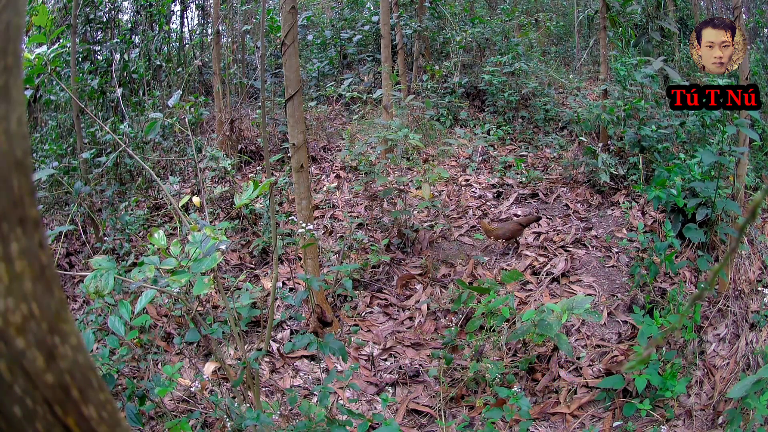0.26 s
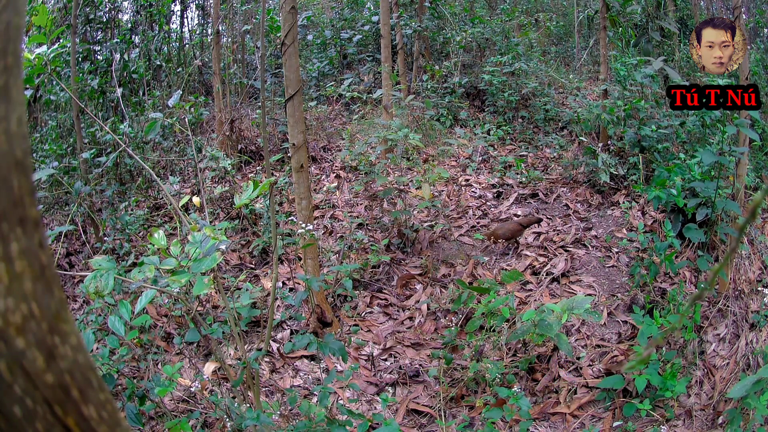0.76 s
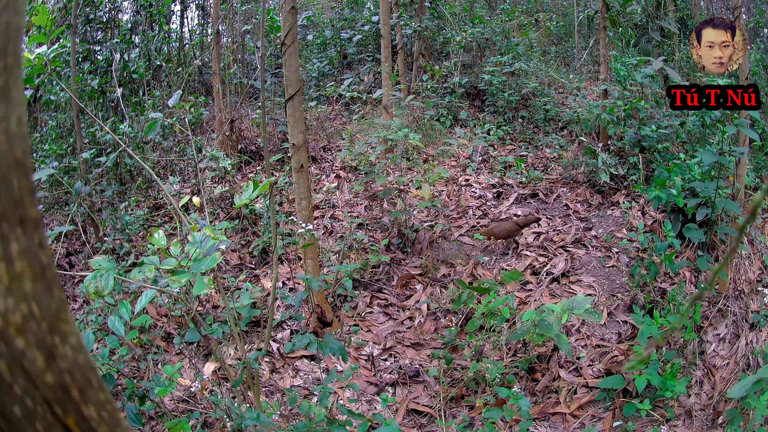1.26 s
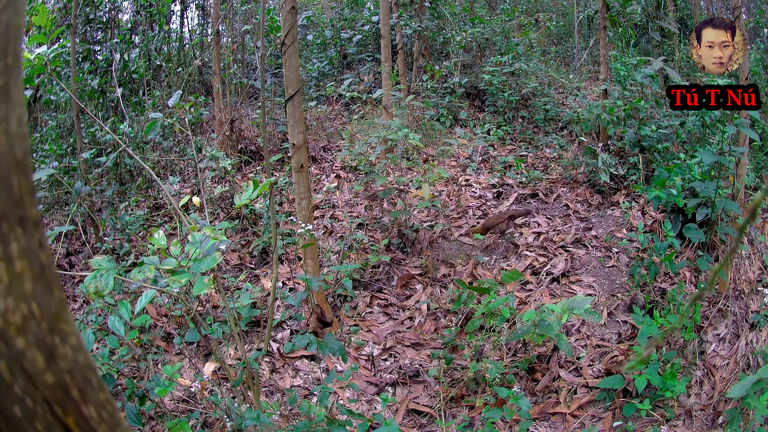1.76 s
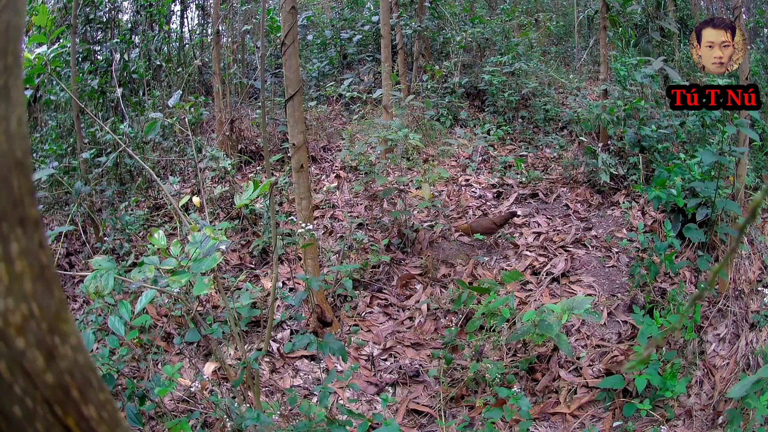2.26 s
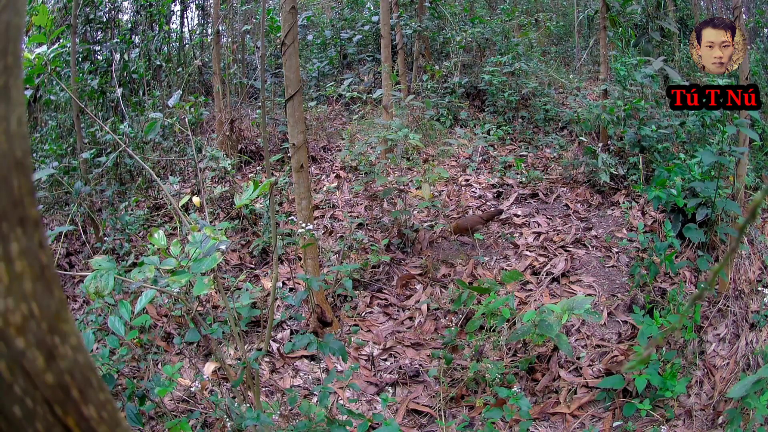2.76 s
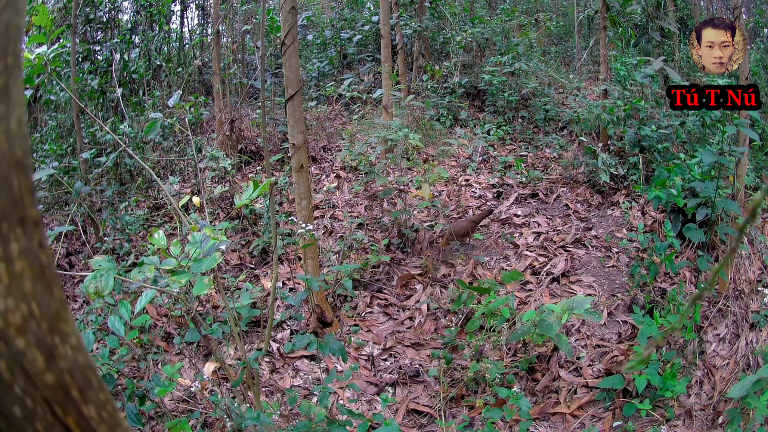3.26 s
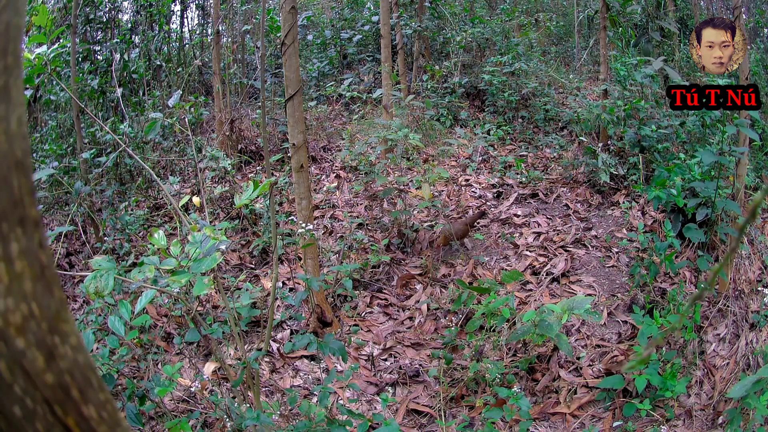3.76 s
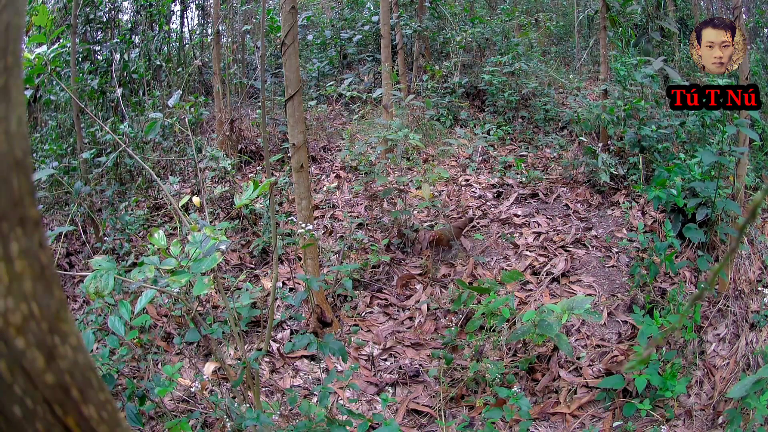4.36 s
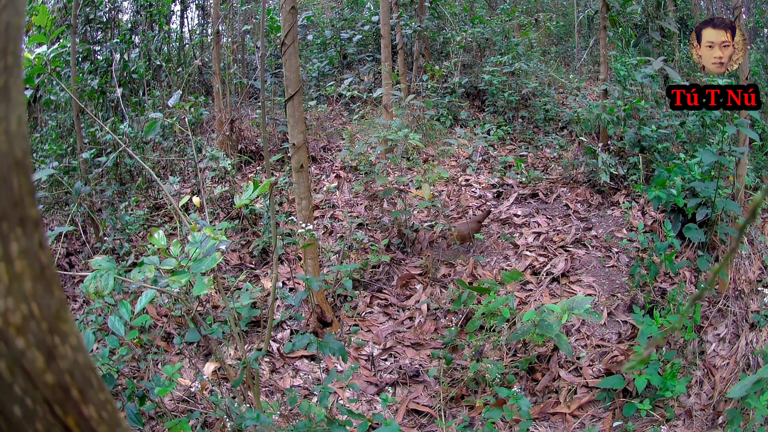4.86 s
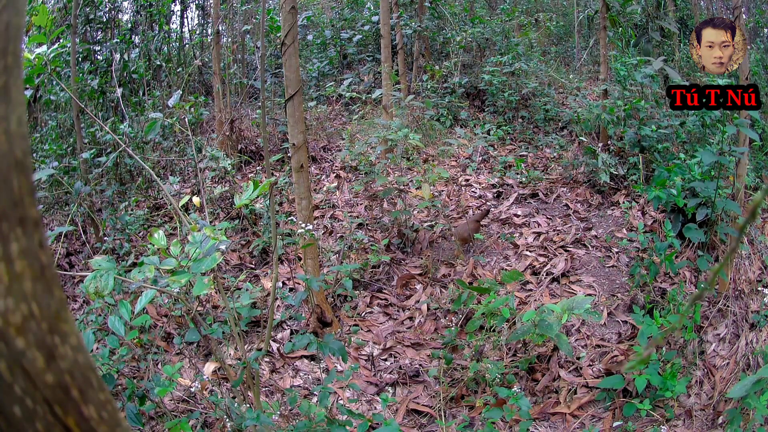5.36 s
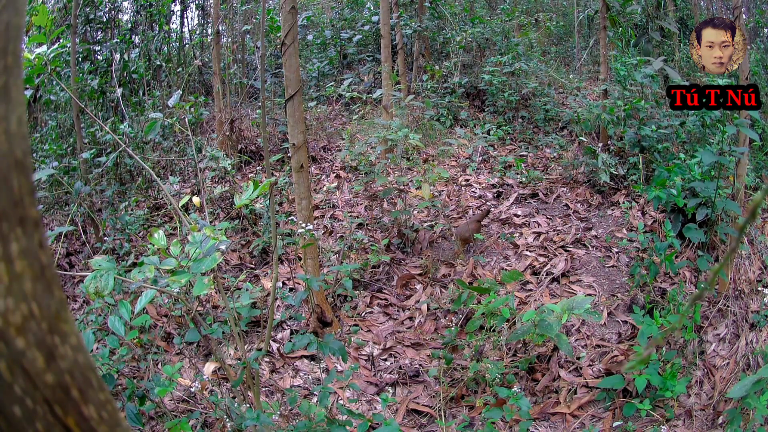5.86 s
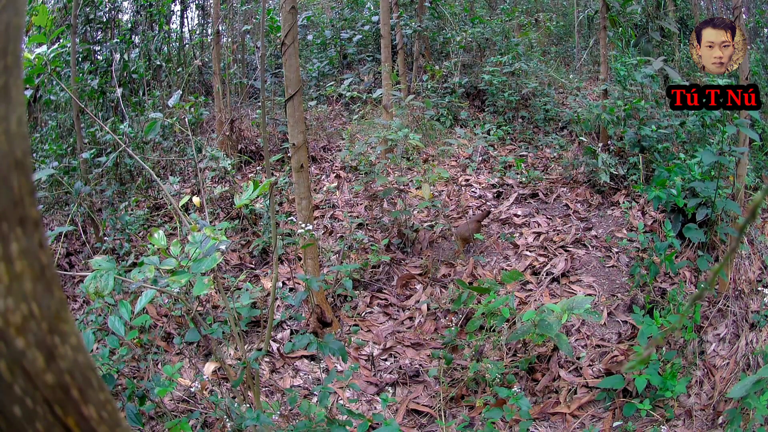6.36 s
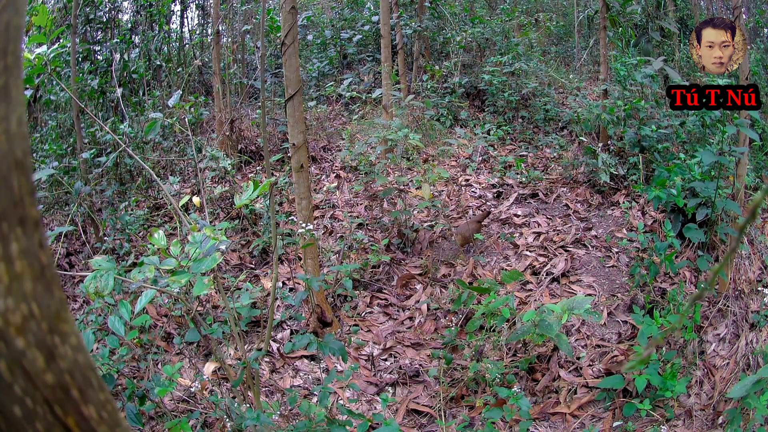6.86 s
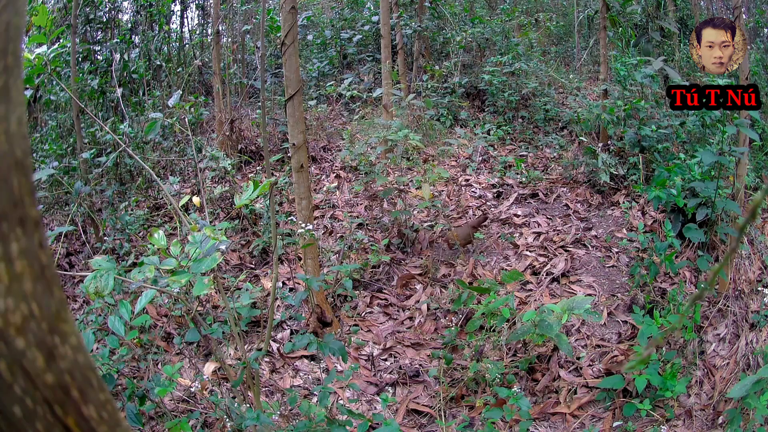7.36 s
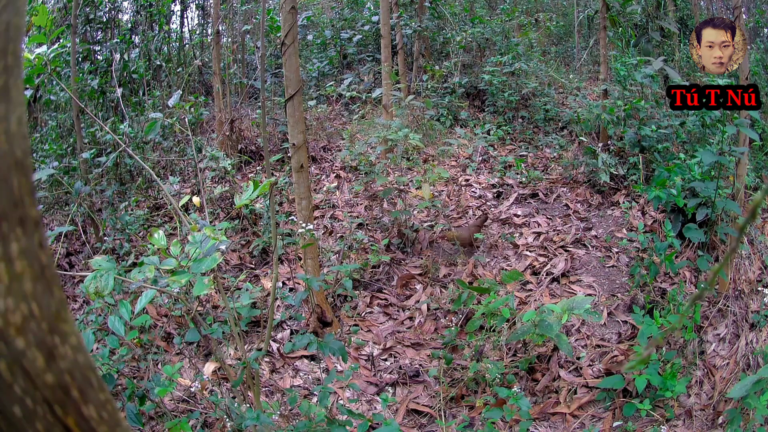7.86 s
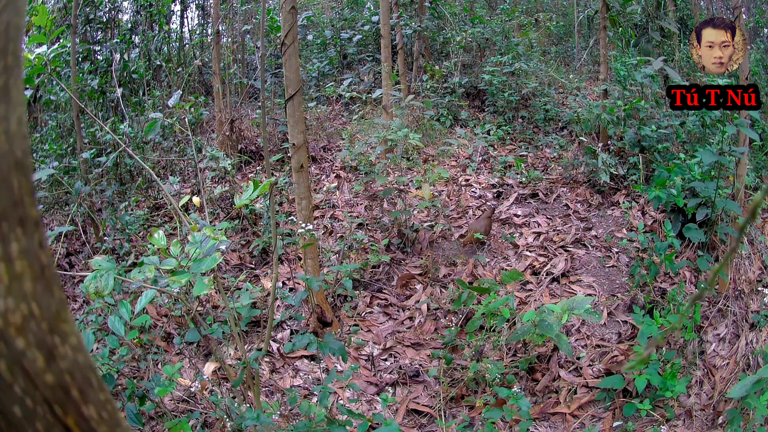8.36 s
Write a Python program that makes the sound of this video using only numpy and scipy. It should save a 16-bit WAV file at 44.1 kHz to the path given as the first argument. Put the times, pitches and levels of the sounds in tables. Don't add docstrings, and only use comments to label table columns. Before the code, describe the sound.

Rapid hoarse bird clucks follow a loud two-push wail in a quiet forest, tiring into ragged squawks before faint leaf rustle and ticks.

```python
import sys
import numpy as np
from scipy import signal
from scipy.fft import rfft, irfft, next_fast_len
from scipy.io import wavfile
from scipy.ndimage import uniform_filter1d, map_coordinates

SR = 44100
rng = np.random.default_rng(int(sys.argv[2]) if len(sys.argv) > 2 else 0)


def ratio_of_db(decibels):
    return 10 ** (np.asarray(decibels, float) / 20)


def put_to_file(sound):
    columns = np.atleast_2d(sound).T
    safe = np.clip(columns, -1, 1)
    whole_steps = np.round(safe * 32767)
    wavfile.write(sys.argv[1], SR, whole_steps.astype(np.int16))


N = 380141
TIME = np.arange(N) / SR


def along(points, hz):
    point_hz, value = np.transpose(points)
    return np.interp(np.log(hz + 1), np.log(point_hz + 1), value)


def curve(points):
    return np.interp(TIME, *np.transpose(points))


def unit(x):
    return x / np.sqrt(np.mean(x ** 2) + 1e-20)


def filtered(x, response):
    size = next_fast_len(N + SR // 2)
    spectrum = rfft(x, size) * response(np.fft.rfftfreq(size, 1 / SR))
    return irfft(spectrum, size)[..., :N]


def resonances(table):
    def ring(f, hz, width):
        return 1j * f * width / (hz * hz - f * f + 1j * f * width)

    def response(f):
        return sum((-1) ** k * ratio_of_db(db) * ring(f, hz, width) ** 2 for k, (hz, width, db) in enumerate(table))
    return response


def wobble(rate):
    return map_coordinates(rng.standard_normal(int(N * rate / SR) + 4), [TIME * rate])


def turns(hz):
    return 2 * np.pi * np.cumsum(hz) / SR


def played(calls, edge_s):
    calls = sorted(calls, key=lambda call: call[0][0])
    s, *columns = np.transpose(np.concatenate(calls))
    s = np.minimum.accumulate(s[::-1])[::-1]
    gate = np.zeros(N)
    for call in calls:
        gate[round(call[0][0] * SR):round(call[-1][0] * SR) + 40] = 1
    gate = uniform_filter1d(gate, int(edge_s * SR) + 1)
    return gate, [np.interp(TIME, s, column) for column in columns]


# start_s, hoarseness (0 to 1)
VOICE_WEAR = [(1, .15), (2.9, .4), (3.1, .8), (4.3, .8), (4.5, 1), (7, 1)]


def hoarseness():
    return curve(VOICE_WEAR)


# start_s, swell_s, fall_s, onset_db, top_db
STEADY_CLUCKS = [(1.165, .018, 0.013, -49, -39.5), (1.275, .025, 0.056, -42, -36),
                 (1.435, 0.052, 0.016, -43.5, -34.5), (1.639, .072, .036, -34.5, -35.5),
                 (1.838, 0.073, 0.035, -36.5, -34), (2.032, 0.069, 0.022, -34, -35.5),
                 (2.225, 0.076, 0.031, -38.5, -35), (2.425, 0.071, 0.026, -36, -35),
                 (2.624, .064, 0.037, -39, -35.5), (2.831, 0.069, 0.036, -37.5, -36.5),
                 (2.932, .015, .015, -52, -61), (3.041, 0.069, 0.038, -46, -38),
                 (3.252, .022, .01, -45.5, -40), (3.288, 0.039, 0.048, -41.5, -35.5),
                 (3.487, .078, 0.036, -41, -36.5), (3.711, 0.072, .028, -39.5, -34.5),
                 (3.937, 0.058, .048, -38.5, -34.5), (4.155, 0.075, .015, -38.5, -36),
                 (4.245, .022, .02, -47, -49.5)]
# start_s, swell_s, fall_s, onset_db,
# top_db
TIRED_CALLS = [(4.405, .035, 0.0081, -44, -47), (4.449, 0.036, 0.049, -37.5, -34.5),
               (4.53, 0.073, 0.022, -49.5, -47), (4.757, .012, .012, -46, -41),
               (4.782, .025, 0.0057, -62, -44), (4.816, 0.058, .05, -35, -37.5),
               (4.948, .036, .022, -37.5, -38), (5.15, 0.013, 0.02, -42, -43),
               (5.181, .03, .003, -68, -55), (5.218, .018, .036, -34.5, -35),
               (5.27, .046, .003, -54, -60), (5.32, .03, .06, -38, -38.5),
               (5.587, 0.0081, .014, -45, -42.5), (5.61, .045, .001, -49.5, -37),
               (5.657, .075, .022, -38, -37.5), (5.755, .012, .008, -38.5, -40),
               (5.776, 0.057, .022, -38.5, -37), (6.131, 0.0059, .012, -47, -44),
               (6.15, 0.072, .006, -56, -50), (6.239, 0.084, .011, -38.5, -39),
               (6.335, 0.053, 0.028, -39.5, -43.5), (6.415, 0.088, 0.039, -52, -39.5),
               (6.542, 0.12, 0.031, -55, -52),
               (6.839, .014, .008, -41.5, -37),
    (6.862, 0.019, .025, -41, -44),
]
# start_s, pitch_hz
POSTURE_PITCH = [(1.2, 2083), (2.5, 1950), (3.25, 2058), (3.9, 1912), (4.6, 1950), (5.3, 2098), (5.7, 2008),
                 (6.84, 2059), (6.86, 1820)]


def cluck_calls():
    calls = []
    for s, swell, fall, onset_db, top_db in STEADY_CLUCKS + TIRED_CALLS:
        start_hz = np.interp(s, *np.transpose(POSTURE_PITCH))
        low_hz = start_hz - min(1000 * swell, 90)
        loss_db = min(803 * fall, 24.5)
        top_s = s + swell
        calls.append([
            (s, onset_db, start_hz),
            (top_s, top_db, low_hz),
            (top_s + 0.5 * fall, top_db - 0.28 * loss_db, low_hz),
            (top_s + fall, top_db - loss_db, low_hz + 40.02),
        ])
    return calls


BEAK_OPENING_HZ = [1790, 1930, 2078]
# pitch_hz, width_hz, level_db
WINDPIPE_RING = [(696, 410, -8), (960, 730, -9.5), (1281, 110, -3), (1533, 350, 4)]
# pitch_hz, width_hz, level_db
HEAD_RING = [(2410, 57, 1), (2490, 63, -32), (4136, 77, -18.5), (4800, 240, -28.5), (5107, 48, -21),
             (7440, 2050, -32.5)]


def clucks():
    gate, (db, throat_hz) = played(cluck_calls(), edge_s=.004)
    hoarse = hoarseness()
    cycles = np.where((hoarse > .6) & (wobble(90) > .1), 3, 2)
    wander = (.055 + .03 * hoarse) * wobble(330) + .03 * wobble(40)
    slap_rate = throat_hz / cycles * (1 + wander)
    at = np.flatnonzero(np.diff(np.floor(np.cumsum(slap_rate) / SR)))
    slaps = np.zeros(N)
    slaps[at] = np.sqrt(cycles[at]) * (1 + .75 * rng.uniform(-1, 1, N)[at])
    slaps = gate * (slaps - slaps.mean()) * ratio_of_db(0.34 * wobble(120))

    def level_match(response):
        return 1 / np.sqrt(np.mean(filtered(slaps, response) ** 2) / np.mean(gate ** 2))
    throat_gain = level_match(resonances([(1950, 505, 0.021)]))
    windpipe = resonances(WINDPIPE_RING)
    windpipe_db = db - 0.12 * (db + 27) - 11.5
    head_db = db + 0.19 * (db + 23.5)
    voice = filtered(slaps * ratio_of_db(windpipe_db), windpipe) * level_match(windpipe)
    voice += filtered(slaps * ratio_of_db(head_db), resonances(HEAD_RING)) * throat_gain
    for k, hz in enumerate(BEAK_OPENING_HZ):
        share = np.interp(throat_hz, sorted(BEAK_OPENING_HZ), np.arange(len(BEAK_OPENING_HZ)) == k)
        voice += filtered(slaps * share * ratio_of_db(db + 1.02), resonances([(hz, 600, 0)])) * throat_gain
    return voice


def pushed(points, doubling_db):
    return [(s, hz / 2, -55.5 + 0.29 * (db + 48.5), db + doubling_db, db) for s, hz, db in points]


# start_s, octave pitch_hz, level_db
OPENING_WHISTLE = [(0.735, 1528, -66), (0.745, 1521, -50), (0.763, 1546, -48.5), (0.791, 2014, -73.5),
                   (0.817, 1670, -49), (0.845, 1940, -58.5), (0.983, 2137, -52.5), (1.0, 1947, -46)]
# start_s, octave pitch_hz, level_db
LOUD_WAIL = [
    [(1.0, 1930, -54), (1.028, 1944, -45.5), (1.176, 2085, -33.5), (1.232, 2038, -40.5),
     (1.254, 2090, -36.5), (1.27, 2182, -39), (1.285, 2202, -41)],
    [(1.286, 2094, -35.5), (1.31, 2018, -34.5), (1.32, 2172, -44), (1.394, 2011, -43), (1.44, 2232, -40.5),
     (1.498, 2025, -38), (1.51, 2110, -46)],
]


def whistle_and_wail():
    return [pushed(OPENING_WHISTLE, -23)] + [pushed(push, -15) for push in LOUD_WAIL]


def sung(row, turn_share, bends, swells_db, octave_db=-5.5):
    s, length, hz, db, doubling_db = row
    points = []
    for share, bend, rel_db in zip((0, turn_share, 1), bends, swells_db):
        level_db = db + rel_db
        points.append((s + share * length, hz * (1 + bend), level_db, level_db + doubling_db, level_db + octave_db))
    return points


# start_s, length_s, pitch_hz, level_db, doubling_db (half-way partial)
LINKING_NOTES = [(1.567, 0.032, 944, -58, -15), (1.624, .015, 1312, -46.5, -5),
                 (1.798, 0.037, 980, -53, -10), (2.002, 0.039, 960, -51, -17), (2.172, .055, 1006, -52, -9),
                 (2.357, 0.0398, 982, -53, -8), (2.538, .035, 977, -51.5, -12),
                 (2.574, .025, 1016, -51.5, -5), (2.733, .06, 1000, -51.5, -8),
                 (4.412, .05, 1271, -50, 1.5), (4.54, .05, 1130, -59, -4)]


def linking_notes():
    return [sung(row, .4, (-.09, 0, .01), (-1.5, 0, -2.5)) for row in LINKING_NOTES]


# start_s, length_s, pitch_hz, level_db, doubling_db
HELD_NOTES = [(2.91, .045, 993, -55.5, -1.5), (3.125, 0.057, 960, -50, -13), (3.362, .078, 902, -48, -9),
              (3.57, 0.069, 934.4, -49, -12.5), (3.75, .065, 969, -50.5, -10),
              (4.69, .075, 1022, -51, -8.5), (4.9, .07, 1001, -48.5, -6.5),
              (5.59, 0.061, 1071, -52.5, -6.5), (6.42, 0.14, 1190, -56.5, -11),
              (6.58, 0.078, 1192, -56, -9.5)]


def held_notes():
    return [sung(row, .3, (-.03, 0, .015), (-1.5, 0, -1.5)) for row in HELD_NOTES]


# start_s, length_s, pitch_hz, level_db, doubling_db
CLIMBING_NOTES = [(1.982, 0.0158, 811, -56, -23), (3.27, 0.028, 1240, -54, -10),
                  (4.77, 0.051, 1161, -54.5, -4), (5.165, 0.051, 1164, -52.5, -6.5),
                  (5.27, .06, 1167, -56, -8), (6.13, .12, 1170, -56, -6)]


def climbing_notes():
    return [sung(row, .6, (-.03, 0, .1), (-1.5, 0, 6), octave_db=-2.5) for row in CLIMBING_NOTES]


# start_s, length_s, from pitch_hz, to pitch_hz, level_db
PIP_NOTES = [
    (1.609, 0.01884, 1834, 1360, -52),
    (2.4, 0.02063, 1480, 1520, -53),
    (6.549, 0.033, 1985, 1890, -40.5),
    (6.663, 0.029, 1925, 2023, -41),
]


def pips():
    calls = []
    for s, length, from_hz, to_hz, db in PIP_NOTES:
        calls.append([(s + u * length, from_hz + u * (to_hz - from_hz), db - 2.5 * abs(2 * u - 1) ** 2)
                      for u in (0, .25, .5, .75, 1)])
    gate, (hz, db) = played(calls, edge_s=0.0041)
    return gate * ratio_of_db(db) * np.sin(turns(hz))


# start_s, rate in beats per s
MEMBRANE_BEAT = [(1.01, 97), (1.116, 88.6), (1.17, 87)]


def beating():
    s, rate = np.transpose(MEMBRANE_BEAT)
    lasting = (TIME > s[0]) * (TIME < s[-1])
    return 1 + 0.48 * lasting * np.sin(turns(np.interp(TIME, s, rate)))


# multiple of the pitch, level_db below the octave
WHOLE_PARTIALS = [(3, -23.5), (4, -32.5), (5, -32)]
# multiple of the pitch, level_db below the doubling partial
HALF_PARTIALS = [(2.5, -11.5), (4.5, -22)]


def clear_notes():
    calls = whistle_and_wail() + linking_notes() + held_notes() + climbing_notes()
    gate, (hz, db, half_db, octave_db) = played(calls, edge_s=0.0028)
    turn = turns(hz * (1 + 0.0055 * wobble(150) + 0.0081 * wobble(40)))
    hoarse = hoarseness()
    breaks_db = 2.3 * (TIME > 1.52) * wobble(45)
    half_db = half_db + 2.5 * (TIME > 1.2) * wobble(35)
    shake_db = 2.96 * (TIME > 1.2) * (TIME < 1.52) * wobble(70.1)

    def partial(level_db, multiple):
        flutter = ratio_of_db((1 + .8 * (TIME > 1.27)) * wobble(110) + breaks_db) + .5 * hoarse * wobble(500)
        return ratio_of_db(level_db) * np.sin(multiple * turn) * flutter
    tone = beating() * partial(db + shake_db, 1) + partial(octave_db, 2)
    tone += partial(half_db, 1.5)
    tone += hoarse * partial(half_db - 7.5, .5)
    for multiple, rel_db in WHOLE_PARTIALS:
        tone += partial(octave_db + rel_db, multiple)
    for multiple, rel_db in HALF_PARTIALS:
        tone += partial(half_db + rel_db, multiple)
    return np.sqrt(2) * (gate * tone + pips())


# pitch_hz, level_db
BEAK_COLOUR = [(300, -23), (420, 5), (2750, 1), (3100, -13), (3400, -8), (3850, -10), (4050, 5),
               (5250, 7.5), (5500, -3), (9000, -8)]


def hen():
    return filtered(clear_notes() + clucks(), lambda hz: ratio_of_db(along(BEAK_COLOUR, hz)))


# start_s, chirp number, level_db
CRICKET_SONG = [(.756, 0, -90), (.862, 2, -67), (1.024, 5, -66), (1.591, 16, -63.5), (2.87, 41, -79),
                (3.885, 61, -62), (4.037, 64, -65), (4.29, 69, -84), (4.69, 77, -74), (5.386, 91, -60.5),
                (5.587, 95, -66), (5.79, 99, -97), (6.58, 114, -62.5), (6.788, 118, -64.5),
                (7.257, 127, -64.5), (7.414, 130, -66), (7.47, 131, -100)]


def cricket():
    s, number, db = np.transpose(CRICKET_SONG)
    stroke = 3.2 * (np.interp(TIME, s, np.round(number)) % 1)
    swell = np.sin(np.pi * np.clip(1.4 * (stroke % 1), 0, 1)) ** 2 * (stroke < 2)
    swell = swell * ratio_of_db(np.floor(stroke) + wobble(45))
    hz = 4680 - 420 * (stroke % 1) + 40 * wobble(40)
    return ratio_of_db(np.interp(TIME, s, db, -150, -150) + 1) * swell * np.sin(turns(hz))


# start_s, peak level_db, pitch_hz
LEAF_TICKS = [
    (4.2652, -37, 9000),
    (4.273, -40, 8600),
    (7.4594, -46, 6100),
    (7.4844, -42, 7560),
    (7.6194, -58, 7610),
    (7.6987, -51, 5290),
    (7.8126, -53, 4300),
    (7.9194, -50, 7850),
]


def ticks():
    out = np.zeros(N)
    t = np.arange(SR // 50) / SR
    for s, db, hz in LEAF_TICKS:
        rough = uniform_filter1d(rng.standard_normal(len(t)) + 0.26, size=20)
        snap = np.sin(2 * np.pi * hz * t) * rough
        fade = ratio_of_db(db + 5 - 60 * t / 0.012)
        out[round(s * SR):][:len(t)] += fade * (1 - np.exp(-t / 0.00056)) * snap
    return out


# start_s, level_db
LEAF_RUSTLE = [
    (7.002, -86),
    (7.46, -73),
    (7.55, -81),
    (7.7, -70),
    (7.95, -76),
    (8.2, -81),
    (8.6, -85),
]


def rustle():
    s, db = np.transpose(LEAF_RUSTLE)
    litter = resonances([(2000, 1000, -1.5), (6600, 4800, -7.5)])
    noise = unit(filtered(rng.standard_normal(N), litter))
    return ratio_of_db(np.interp(TIME, s, db, left=-150) + 5.2 * wobble(30)) * noise


# pitch_hz, time to fall 60 dB in s
TREE_TAIL = [(500, 0.16), (2000, 0.21), (6000, 0.61)]


def trees(x):
    hz, t, z = signal.stft(rng.standard_normal(SR // 2), SR, nperseg=256)
    fading = z * ratio_of_db(-60 * t / along(TREE_TAIL, hz)[:, None])
    tail = signal.istft(fading, SR, nperseg=256)[1]
    return signal.fftconvolve(np.pad(x, (300, 0)), tail / np.linalg.norm(tail))[:N]


def whine():
    hz = 7063 + 110.4 * np.arange(-1, 9)[:, None]
    level = ratio_of_db(-86.5 + 1.5 * rng.standard_normal((len(hz), 1)))
    return (level * np.sin(2 * np.pi * (hz * TIME + rng.random((len(hz), 1))))).sum(0)


# pitch_hz, level_db per Hz
HISS_COLOUR = [(15, -4), (25, -11.5), (33, -13), (69, -17), (104, -19), (139, -16.5), (419, -22),
               (1040, -26.5), (1130, -27.5), (1690, -30.5), (3130, -36), (4560, -37), (8930, -37.5),
               (12000, -40.5), (15300, -52.5)]


def hiss():
    air = unit(filtered(rng.standard_normal(N), lambda hz: ratio_of_db(along(HISS_COLOUR, hz)) * (hz > 20)))
    return ratio_of_db(-58 + 0.74 * wobble(2.814)) * air


def scene():
    near = hen() + cricket()
    return (near + ratio_of_db(-15.5) * trees(near) + ticks() + rustle() + whine() + hiss())[None]


DULL_STEPS = [56, 57, 62, 63, 69, 75, 81, 87, 88, 94, 101, 108, 115, 122, 129, 137, 160, 165, 174, 191, 213]


def dull_moments():
    dull = np.zeros(N)
    for step in DULL_STEPS:
        start_s = .02 + .032 * step
        length_s = .032 + (.003 if step + 1 in DULL_STEPS else -.003)
        dull[(TIME > start_s) & (TIME < start_s + length_s)] = 1
    return uniform_filter1d(dull, size=60)


def band_limit(x):
    return signal.sosfilt(signal.butter(12, 15420, fs=SR, output="sos"), x)


def record(dry):
    top = filtered(dry, lambda hz: hz > 8850)
    kept = filtered(dry - dull_moments() * top, lambda hz: hz < 15480)
    mix = kept - .011
    return band_limit(mix)


dry = scene()
out = record(dry)
put_to_file(out)
```